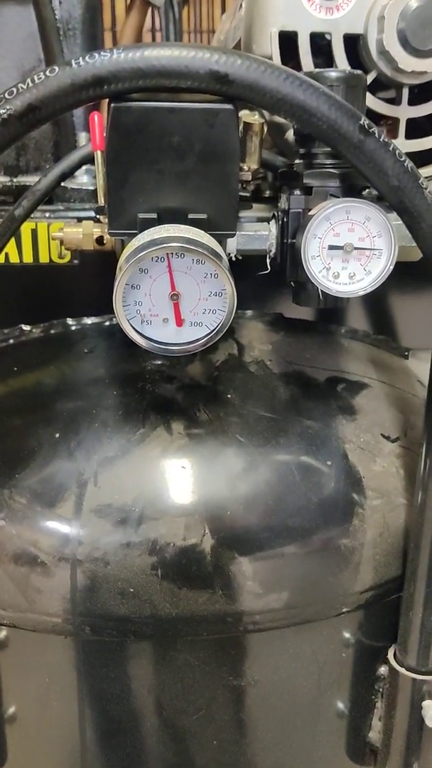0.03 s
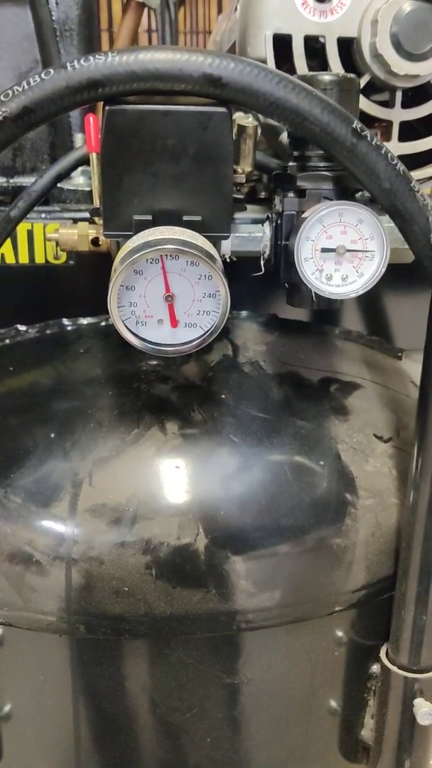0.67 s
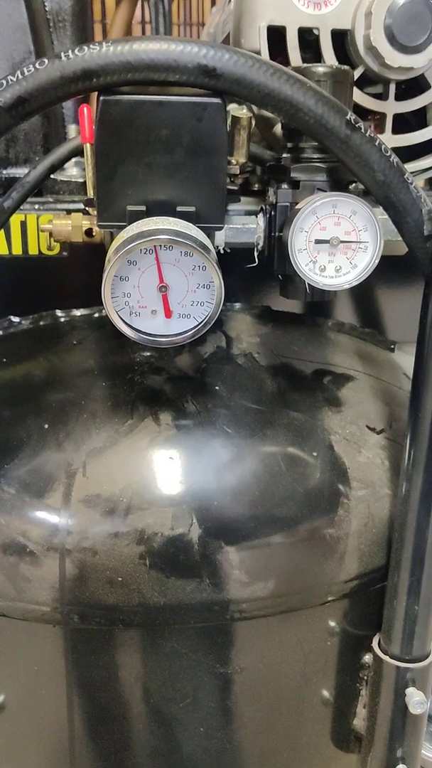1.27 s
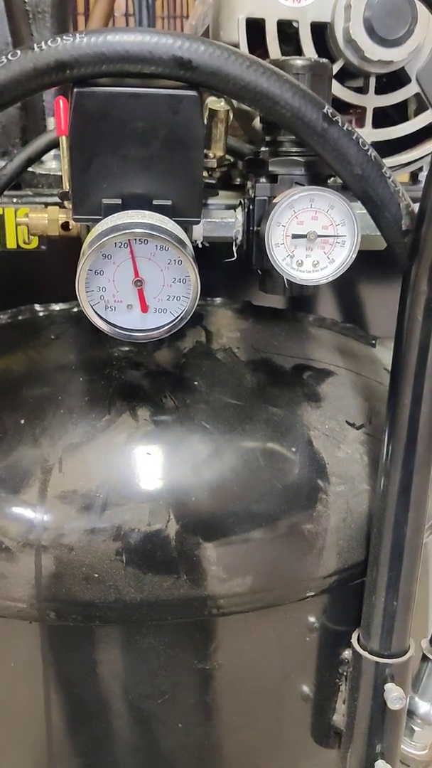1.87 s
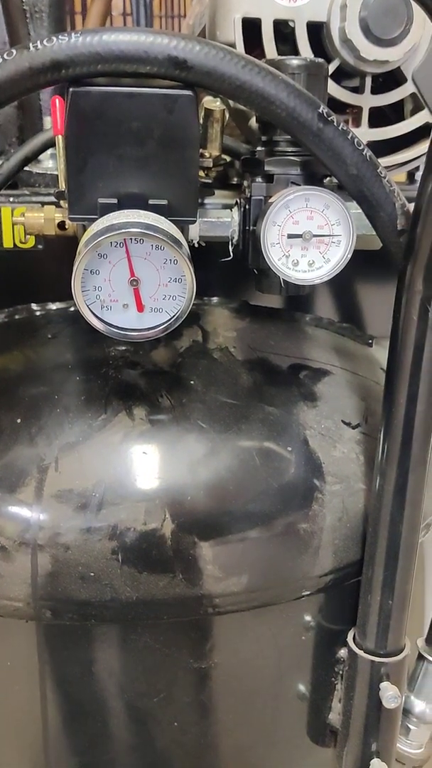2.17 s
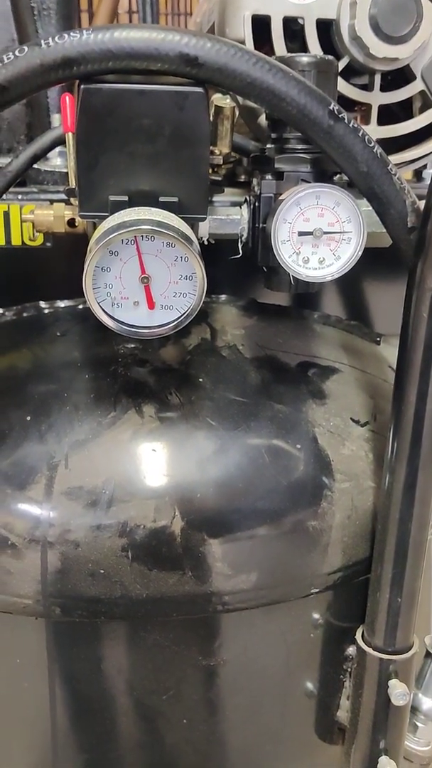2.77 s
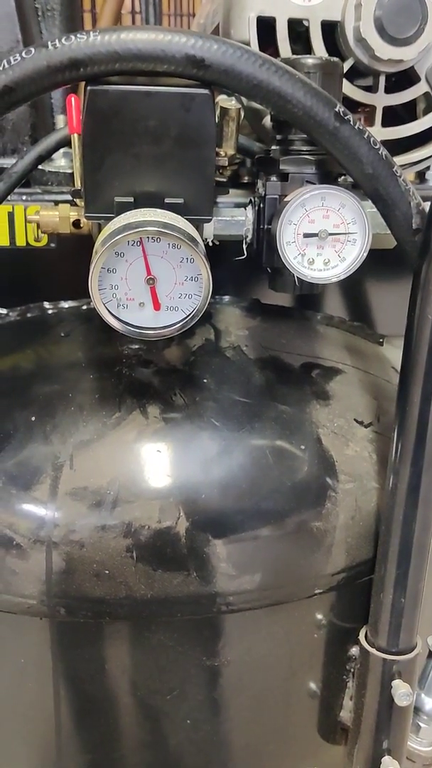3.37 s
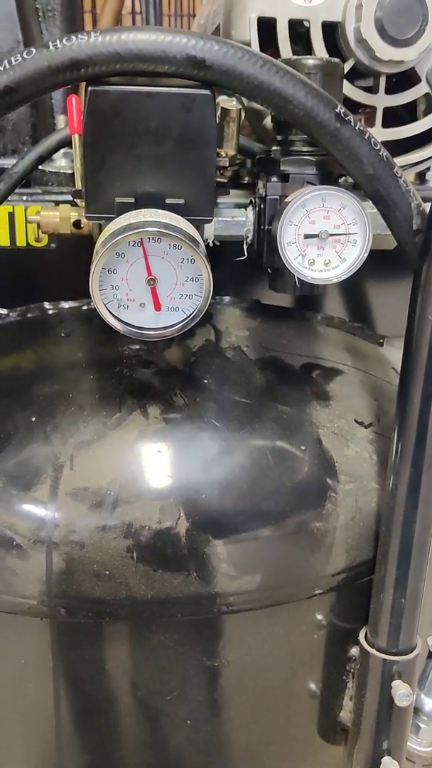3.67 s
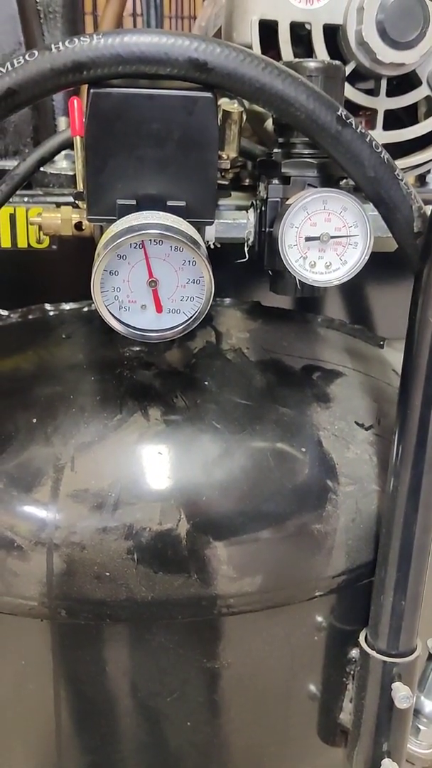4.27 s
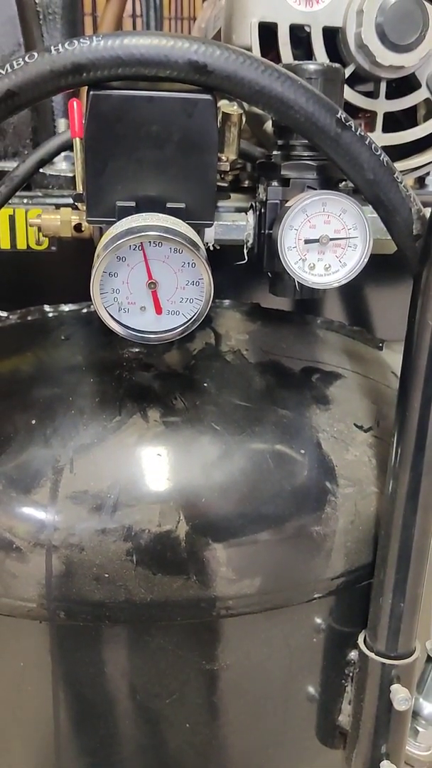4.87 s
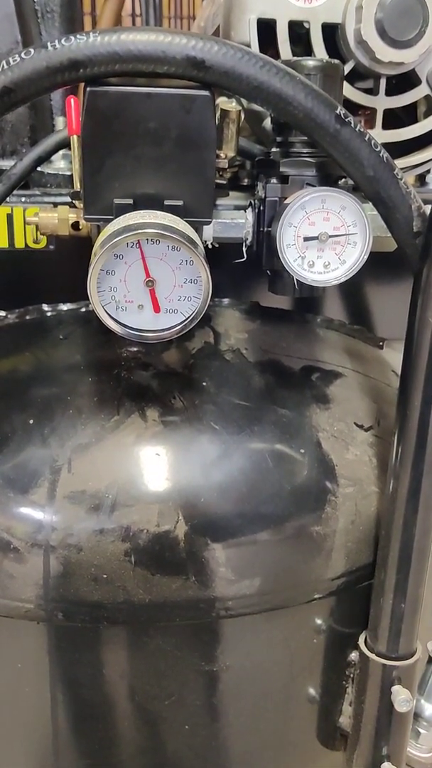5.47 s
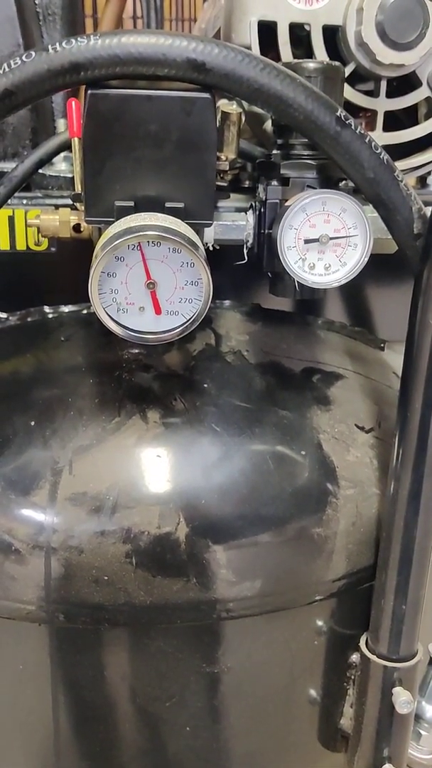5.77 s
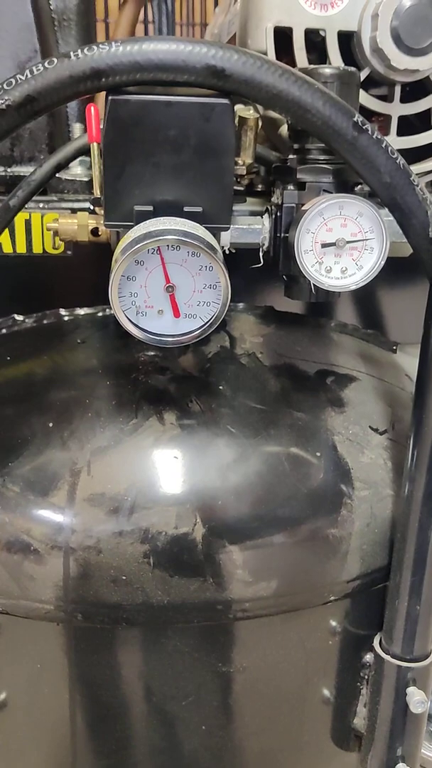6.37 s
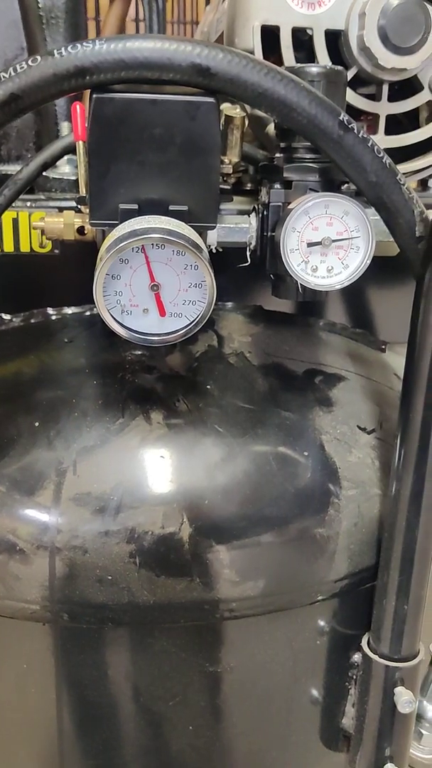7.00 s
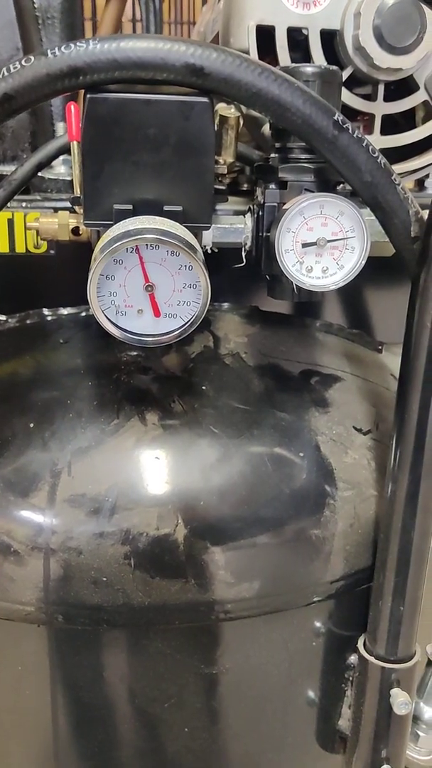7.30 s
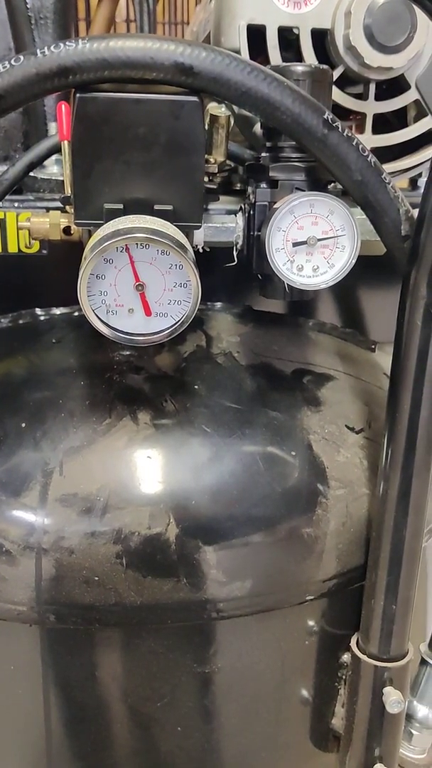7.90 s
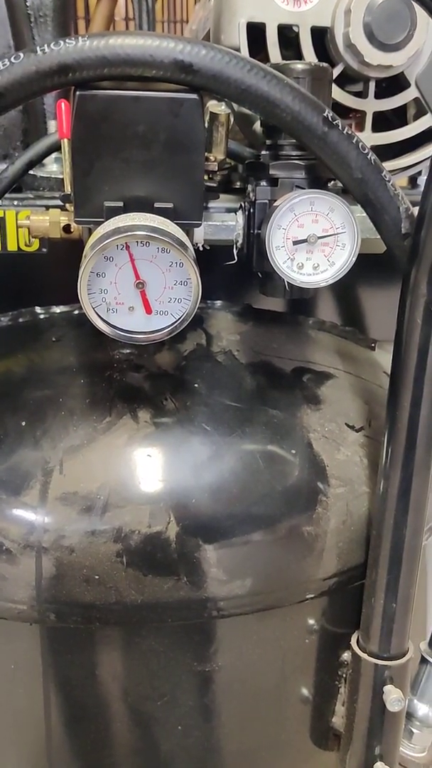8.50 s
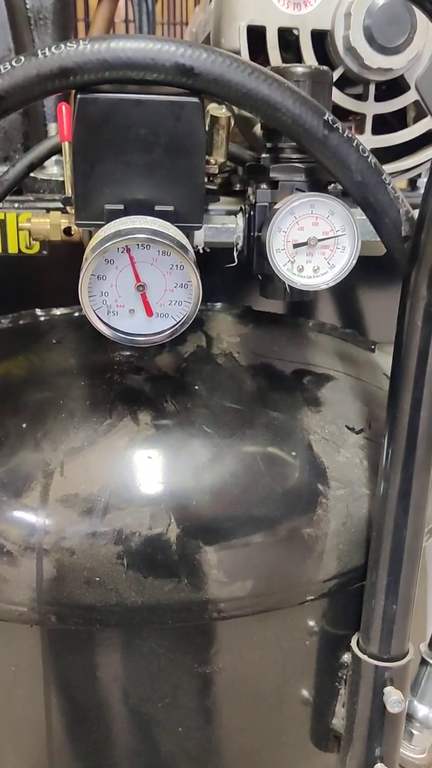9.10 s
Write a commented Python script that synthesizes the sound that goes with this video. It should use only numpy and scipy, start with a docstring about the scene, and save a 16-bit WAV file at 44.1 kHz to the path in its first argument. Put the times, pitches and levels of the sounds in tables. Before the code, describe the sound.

In a workshop, a jet of air escapes continuously from a compressor tank, making an even, high hiss over a very faint low rumble and hum. It is heard from close by on a hand-held microphone, which catches two small low pops early, slight puffs of draught, and later a soft knock followed by three more pops.

```python
"""A jet of compressed air bleeds steadily from a compressor tank in a workshop; the pump stays off.
Its turbulence radiates a broadband hiss, coloured by narrow resonances and echoes from nearby metal.
The two ports of a hand-held microphone take some low pressure pops, one soft knock and a little draught.
Low room rumble and a faint mains hum lie underneath."""
import sys
import numpy as np
from scipy import signal
from scipy.fft import rfft, irfft
from scipy.io import wavfile

SR = 44100
rng = np.random.default_rng(int(sys.argv[2]) if len(sys.argv) > 2 else 0)


def digitize_waveform(pressure):
    """Quantize a signal to 16-bit integers and store it at the path in sys.argv[1].

    Rows of a 2-D input are taken as channels; values are limited to [-1, 1].
    """
    field = np.atleast_2d(pressure).T
    bounded = np.clip(field, -1, 1)
    quanta = np.round(bounded * 32767).astype(np.int16)
    wavfile.write(sys.argv[1], SR, quanta)


N = 407925
TIME, HZ = np.arange(N) / SR, np.fft.rfftfreq(N, 1 / SR)


# Spectrum of the hiss at each port: (frequency [Hz], relative spectral density [dB])
HISS_LEFT = [(250, -28.5), (520, -27.2), (700, -21.6), (1450, -21.6), (2300, -17.6), (3400, -12.3),
             (5500, -7.2), (6150, -2.2), (6900, -10.9), (9500, -9.2), (13000, -9.8), (15700, -7.7)]
HISS_RIGHT = [(250, -27.3), (480, -27.3), (680, -22.3), (1480, -20.3), (1900, -13.6), (2600, -13),
              (3300, -8.9), (5400, -6), (6100, -1), (6650, -.7), (7150, -3.6), (7700, -11.3), (9100, -9.3),
              (10200, -20.8), (15700, -11.2)]
# Resonances excited by the jet: (frequency [Hz], bandwidth [Hz], peak gain [dB])
RESONANCES = [(2209, 30, 2.5), (3903, 28, 4), (4342, 48, 2.5), (4682, 18, 5), (5153, 18, 5), (5776, 38, 3),
              (6110, 30, 3), (6423, 27, 2), (6602, 60, 2), (8981, 22, 4), (11208, 43, 2.5), (11924, 50, 3),
              (12412, 27, 3), (13838, 18, 3.5)]
def jet(ripple_db=1.37, flutter_db=0.33, flutter_hz=25, low_cut_hz=130):
    """Turbulent mixing at the bleed valve radiates noise, filtered by resonances and reflections."""
    resonance_db = sum(db / (1 + (2 * (HZ - hz) / width) ** 2) for hz, width, db in RESONANCES)
    hiss_db = np.array([curve(HISS_LEFT), curve(HISS_RIGHT)])
    colour_db = hiss_db + resonance_db + ripple_db * echo_ripple(decay_s=0.054)
    efficiency = HZ ** 2 / (HZ ** 2 + low_cut_hz ** 2)  # a small jet radiates little bass
    hiss = unit_rms(irfft(port_noise() * gain_of(colour_db) * efficiency, N))
    flutter = unit_rms(irfft(white_spectra(count=1) / (1 + (HZ / flutter_hz) ** 2), N))
    return hiss * gain_of(jet_level_db() + flutter_db * flutter)


# Brief dips of the hiss at the left port: (time [s], level change [dB])
HISS_DIPS = [(.73, -2), (2.77, -1.6), (3.73, -1.7), (4.57, -1), (6.57, -1.1)]
def jet_level_db(left_db=-15.35, right_db=-15.8, sag_db_per_s=.015, dip_half_s=.06):
    """Jet noise weakens as tank pressure falls; the balance between the ports also shifts slightly."""
    left, right = port(side=0), port(side=1)
    sagging = left * left_db + right * right_db - sag_db_per_s * TIME
    settling = 1.9 * np.exp(-TIME / .5)  # louder on the right at first
    late_drop = -.5 * np.clip((TIME - 7.6) / .6, 0, 1)  # the hiss leans left from 7.6 s
    dips = sum(db * np.exp(-2 * ((TIME - s) / dip_half_s) ** 2) for s, db in HISS_DIPS)
    return sagging + right * (settling + late_drop) + left * dips


def echo_ripple(decay_s):
    """Interference of many weak early reflections combs the spectrum, differently at each port."""
    envelope = (TIME > .001) * np.exp(-TIME / decay_s) / np.sqrt(TIME + .001)
    echoes = rng.standard_normal((2, N)) * envelope
    return unit_rms(rfft(echoes).real)


# Likeness of the sound at the two ports: (frequency [Hz], coherence [0-1])
COHERENCE = [(60, 0.36), (300, 0.62), (750, 0.6), (1050, 0.18), (1600, 0.7), (2800, 0.24), (5000, 0),
             (6200, 0.2), (8000, 0.06), (15000, 0)]
# Phase of the left port relative to the right: (frequency [Hz], phase lead [rad])
PHASE_LEAD = [(100, -0.5), (1000, -0.11), (2000, 1.5), (2900, 3), (4200, 5.5), (5200, 9), (6100, 11.5),
              (7000, 13.5), (9000, 17)]
def port_noise():
    """Partial coherence: the noise spectra at the two ports share a component, shifted in phase."""
    shared, independent = white_spectra(count=2)
    coherence = np.clip(curve(COHERENCE), 0, 1)
    left = shared * np.exp(1j * curve(PHASE_LEAD))
    right = coherence * shared + np.sqrt(1 - coherence ** 2) * independent
    return np.array([left, right])


# Pressure pops: (time [s], level [dB], leak time constant [s], rise exponent [-], port [0 left, 1 right])
POPS = [(.203, -16.6, .024, 1.0, 1), (1.048, -23.5, .009, .2, 0), (7.671, -16, .026, .85, 0),
        (8.1135, -7.7, .028, .68, 0), (8.974, -22.6, .022, 1.2, 0)]
def pops(swing_s=.043, cutoff_hz=2200):
    """Pressure relaxation: a step on one port leaks away and swings below zero after swing_s."""
    pressure = np.zeros((2, N))
    for s, db, leak_s, exponent, side in POPS:
        age = np.maximum(TIME - s, 0)
        snap = gain_of(db) ** 2 * (age > 0)  # the hardest pops start abruptly
        rise = (age / swing_s) ** exponent + snap
        pulse = rise * (1 - age / swing_s) * np.exp(-np.minimum(age, 1) / leak_s)
        pressure += port(side) * gain_of(db) * pulse / pulse.max()
    return signal.sosfilt(signal.butter(2, cutoff_hz, fs=SR, output="sos"), pressure + 1e-12)


def muffling(db_per_power=19, hold_s=0.18):
    """Gain reduction: a pop briefly lowers its port's sensitivity, by decibels proportional to its power."""
    load = np.zeros((2, N))
    for s, db, _, _, side in POPS:
        progress = np.clip((TIME - s) / hold_s, 0, 1)
        load += port(side) * gain_of(db) ** 2 * np.sqrt(np.abs(np.sin(np.pi * progress)))
    return gain_of(-db_per_power * load)


# A knock and its rebounds: (time [s], level [dB], frequency [Hz], 60 dB decay time [s])
IMPACTS = [(6.8237, -25, 170, .018), (6.828, -33.5, 380, .025), (6.836, -30, 140, .02)]
def knock():
    """Structure-borne sound: heavily damped vibration of the housing reaches both ports alike."""
    vibration = np.zeros(N)
    for s, db, hz, t60 in IMPACTS:
        age = np.maximum(TIME - s, 0)
        decay_db = 60 * np.minimum(age / t60, 2)
        vibration += gain_of(db - decay_db) * np.sin(2 * np.pi * hz * age)
    return vibration


# Swells of stray air: (time [s], half duration [s], level [dB], port [0 left, 1 right])
DRAUGHTS = [(1.29, 0.087, -46, 1), (3.84, 0.2, -40.5, 1), (4.25, 0.27, -44.5, 1), (7.5, 0.25, -45, 1),
            (8.5, .3, -49, 0)]
# Spectrum of the wind noise: (frequency [Hz], relative spectral density [dB])
WIND_SPECTRUM = [(10, -4), (35, -6), (70, -8.5), (130, -31), (400, -45), (1500, -80)]
def draughts():
    """Wind noise: air brushing a port makes short swells of low-frequency pressure fluctuation."""
    swells = sum(port(side) * gain_of(db) * np.exp(-2 * ((TIME - s) / half_s) ** 2)
                 for s, half_s, db, side in DRAUGHTS)
    wind = unit_rms(irfft(white_spectra(count=2) * gain_of(curve(WIND_SPECTRUM)), N))
    return swells * wind


# Spectrum of the room rumble: (frequency [Hz], relative spectral density [dB])
ROOM_SPECTRUM = [(15, -6.5), (40, -0.5), (80, -4.5), (130, -4), (220, -7.5), (400, -20), (1000, -50)]
def workshop(rumble_db=-54.5, hum_db=-63.5, hum_hz=59.6):
    """Ambient noise floor: a continuous low rumble plus a pure tone at the mains frequency."""
    rumble = unit_rms(irfft(port_noise() * gain_of(curve(ROOM_SPECTRUM)), N))
    hum = unit_rms(np.sin(2 * np.pi * hum_hz * TIME))
    return gain_of(rumble_db) * rumble + gain_of(hum_db) * hum


def gain_of(db):
    """Amplitude ratio of a level in decibels."""
    return 10 ** (np.asarray(db) / 20)


def unit_rms(x):
    """Normalisation of each channel to an rms of 1."""
    return x / np.sqrt(np.mean(x ** 2, axis=-1, keepdims=True) + 1e-20)


def curve(points):
    """Interpolation of (frequency [Hz], value) points on a logarithmic frequency axis."""
    hz, value = np.transpose(points)
    return np.interp(np.log(HZ + 1), np.log(hz + 1), value)


def white_spectra(count):
    """Spectra of uncorrelated white noises."""
    return rfft(rng.standard_normal((count, N)))


def port(side):
    """Channel gains that select one microphone port: 0 left, 1 right."""
    return np.array([[side < .5], [side >= .5]], float)


def scene():
    """Superposition of the airborne sound, muffled during pops, and what touches the microphone."""
    return (jet() + workshop()) * muffling() + pops() + knock() + draughts()


def record(dry, cutoff_hz=15790):
    """Band limiting: a steep linear-phase low-pass filter removes the highest treble."""
    low_pass = signal.firwin(2047, cutoff_hz, window=("kaiser", 9), fs=SR)
    return signal.oaconvolve(dry, low_pass[None], "same")


dry = scene()
out = record(dry)
digitize_waveform(out)
```